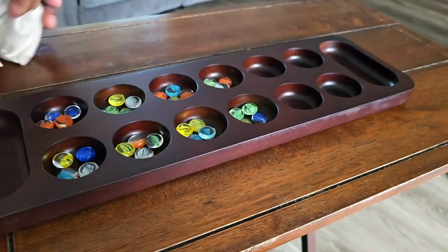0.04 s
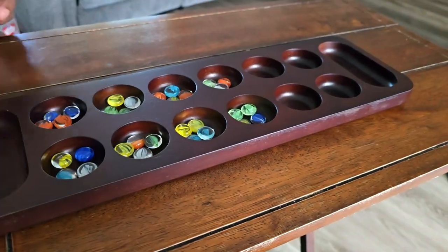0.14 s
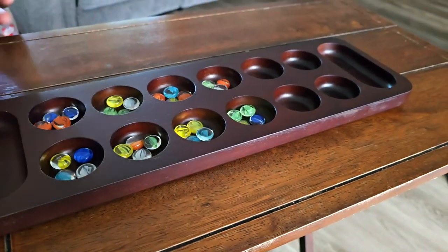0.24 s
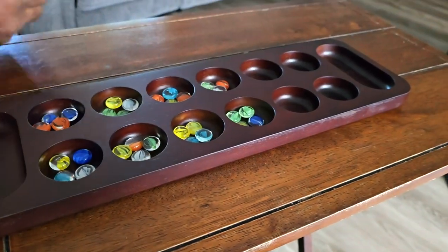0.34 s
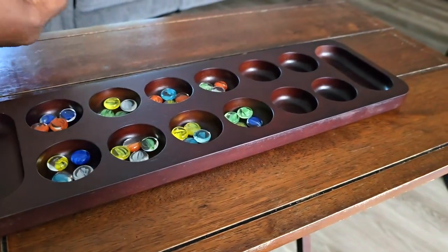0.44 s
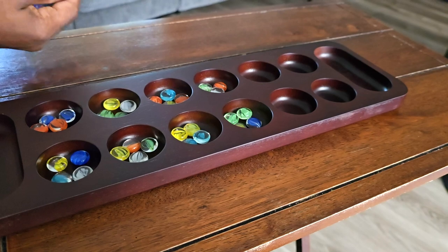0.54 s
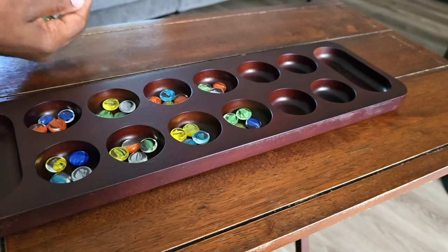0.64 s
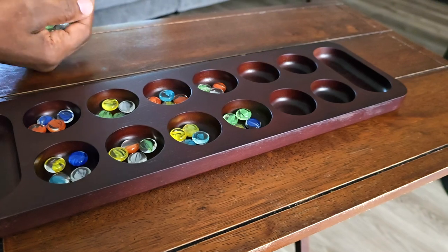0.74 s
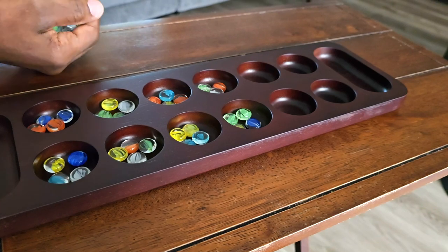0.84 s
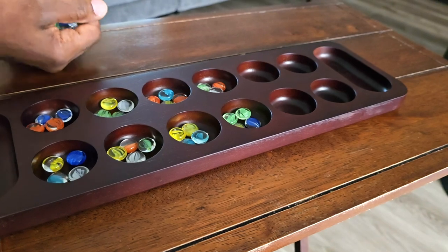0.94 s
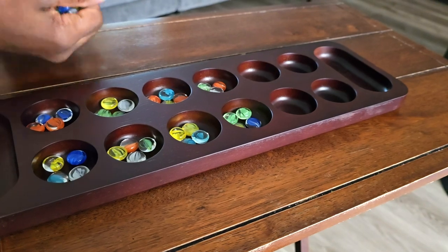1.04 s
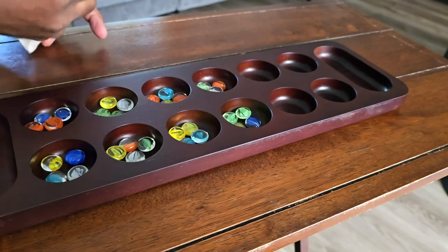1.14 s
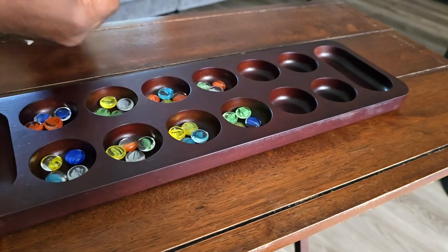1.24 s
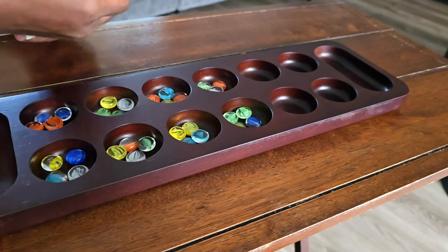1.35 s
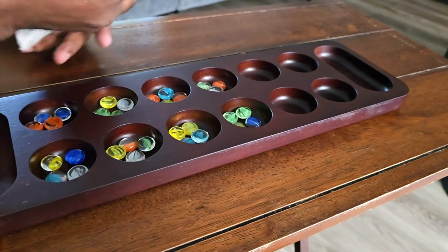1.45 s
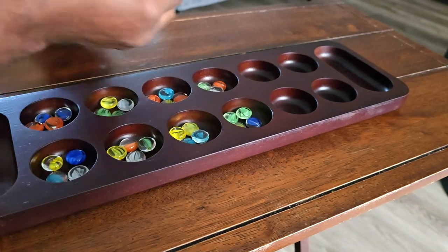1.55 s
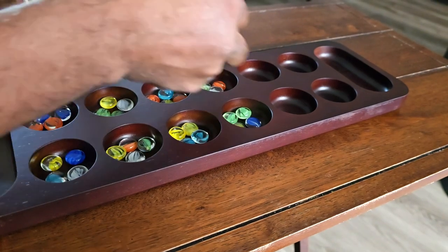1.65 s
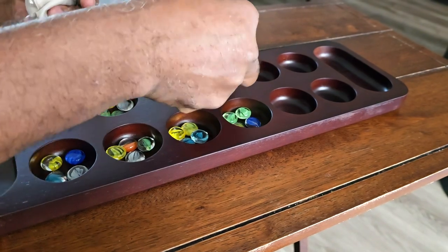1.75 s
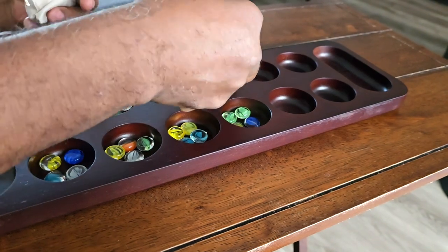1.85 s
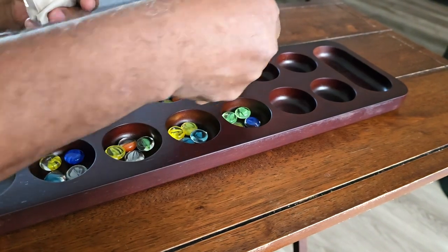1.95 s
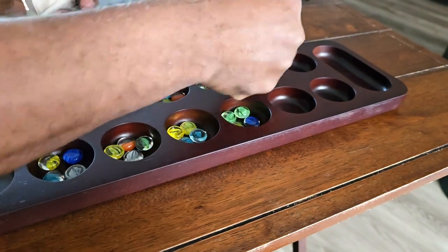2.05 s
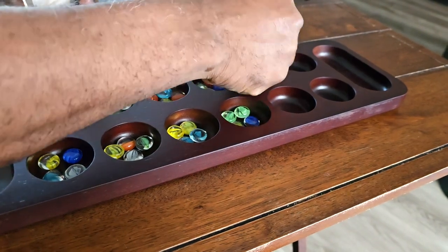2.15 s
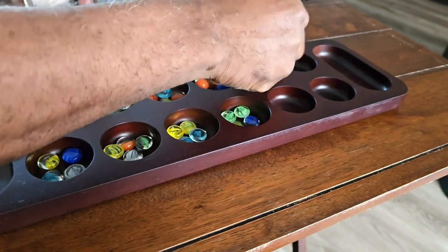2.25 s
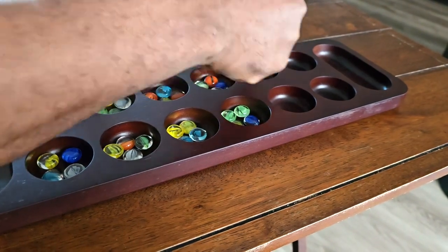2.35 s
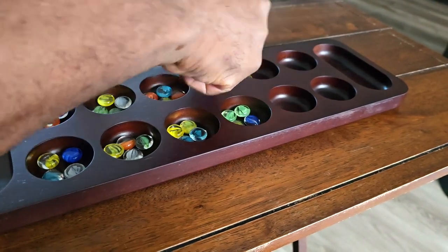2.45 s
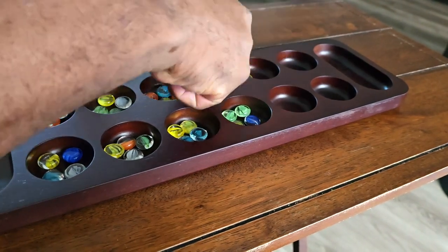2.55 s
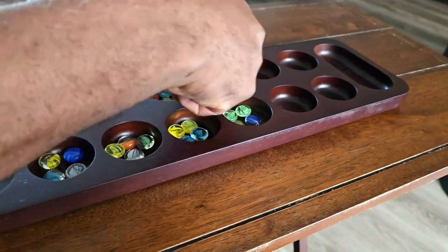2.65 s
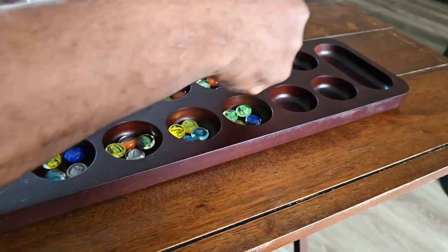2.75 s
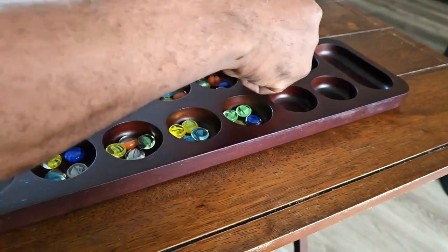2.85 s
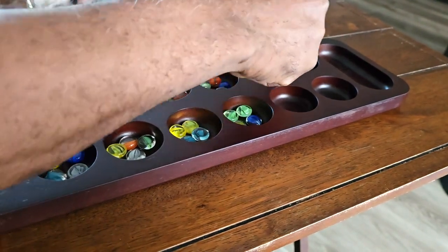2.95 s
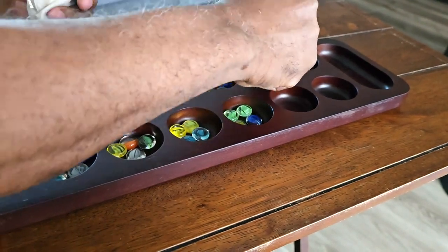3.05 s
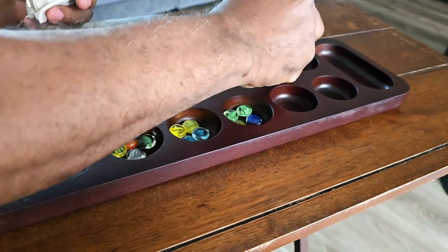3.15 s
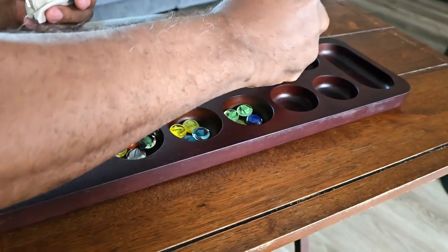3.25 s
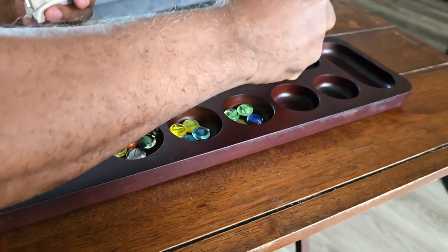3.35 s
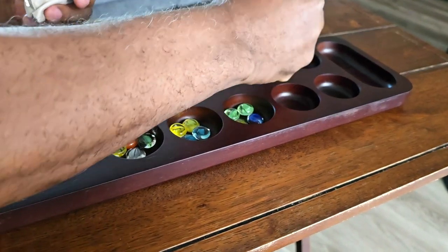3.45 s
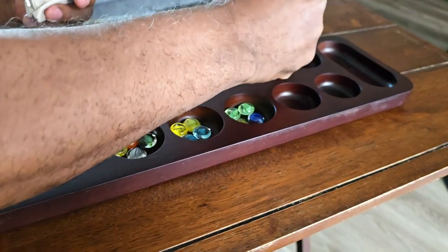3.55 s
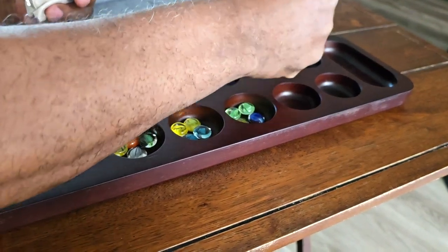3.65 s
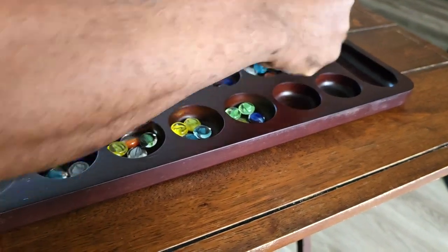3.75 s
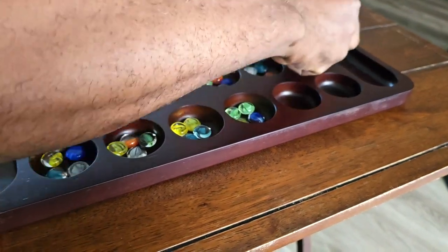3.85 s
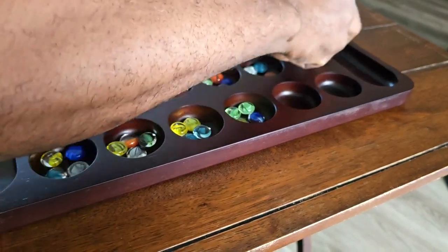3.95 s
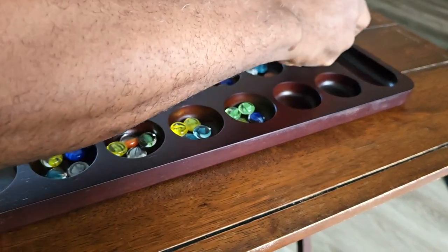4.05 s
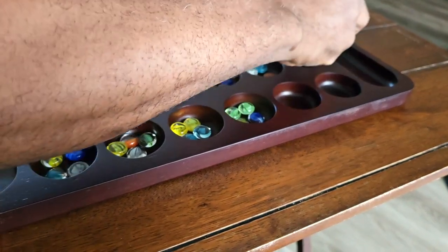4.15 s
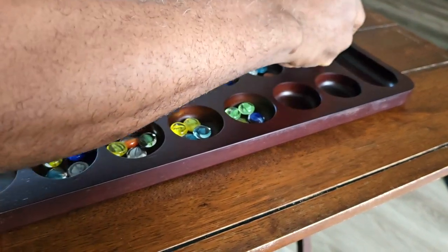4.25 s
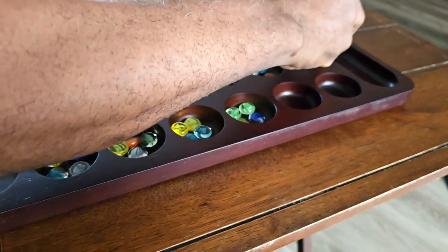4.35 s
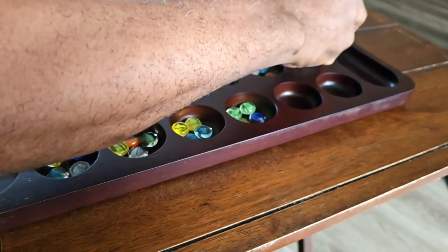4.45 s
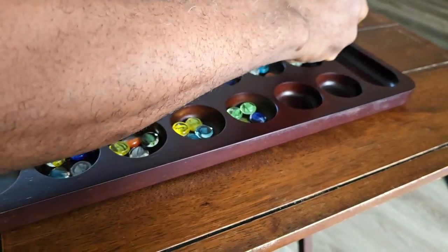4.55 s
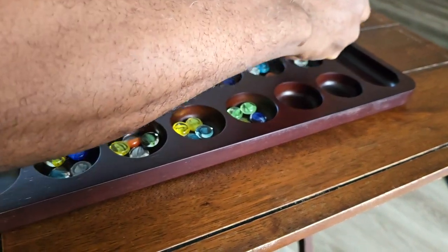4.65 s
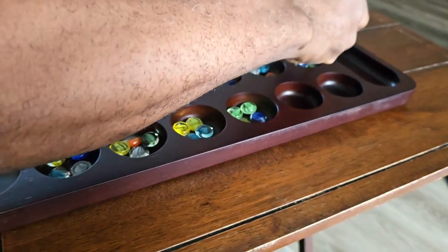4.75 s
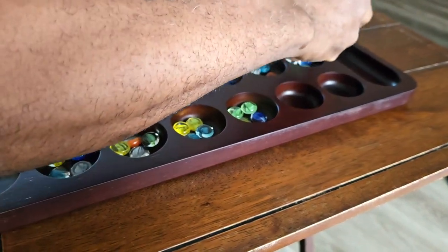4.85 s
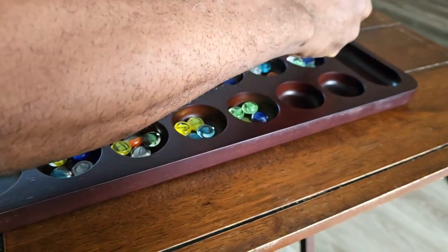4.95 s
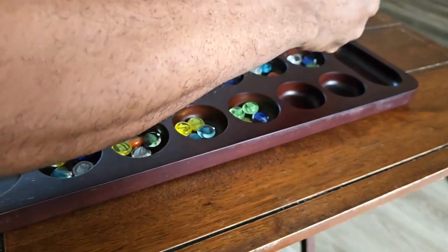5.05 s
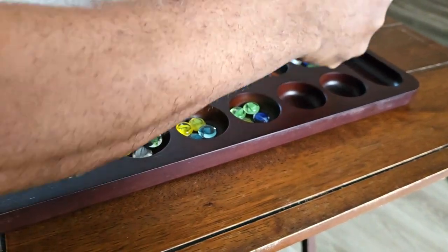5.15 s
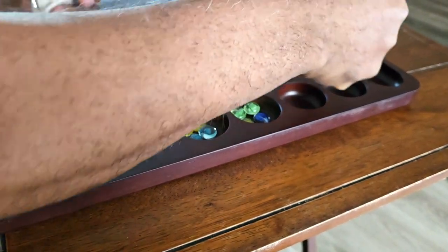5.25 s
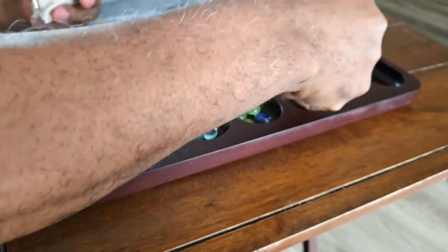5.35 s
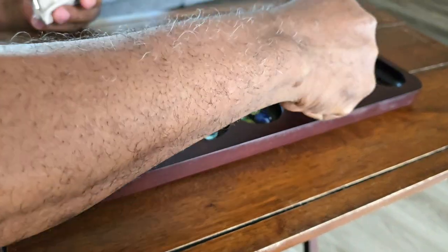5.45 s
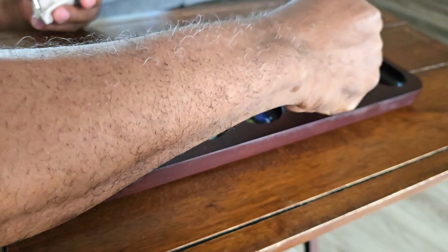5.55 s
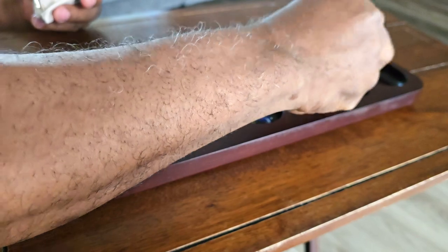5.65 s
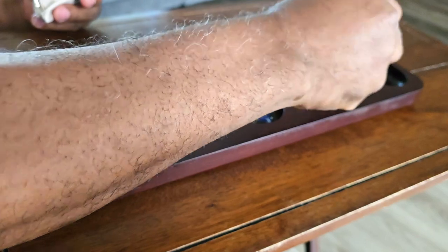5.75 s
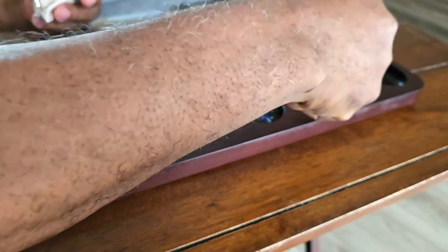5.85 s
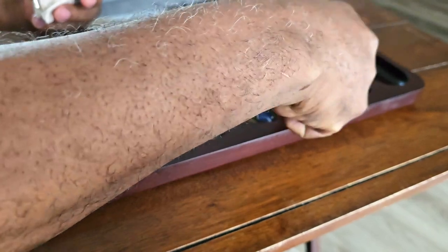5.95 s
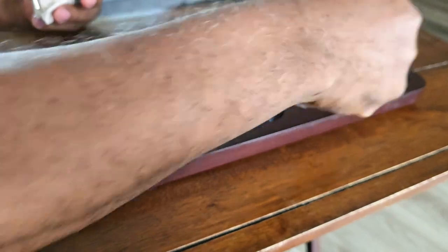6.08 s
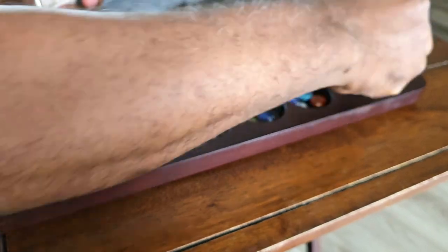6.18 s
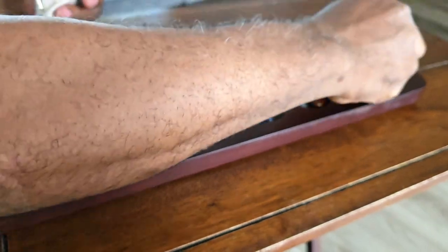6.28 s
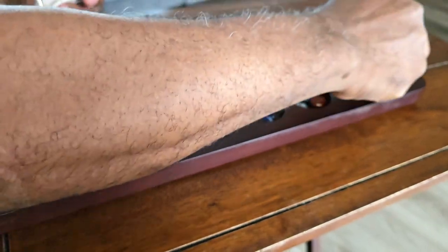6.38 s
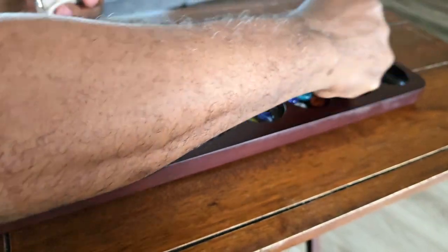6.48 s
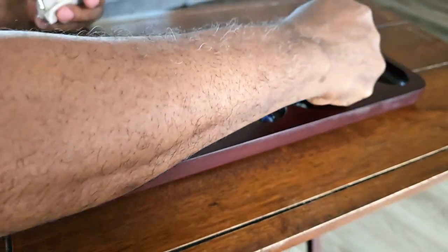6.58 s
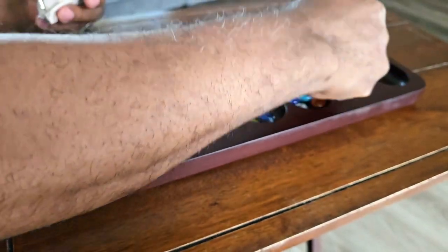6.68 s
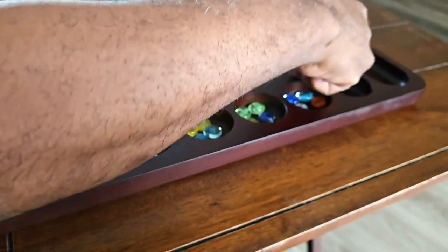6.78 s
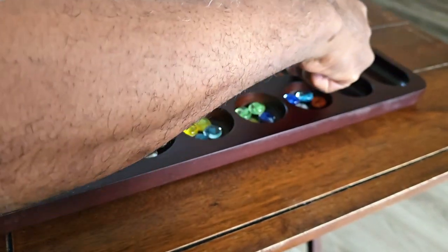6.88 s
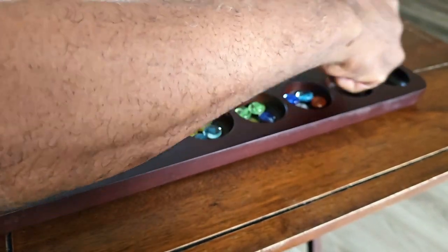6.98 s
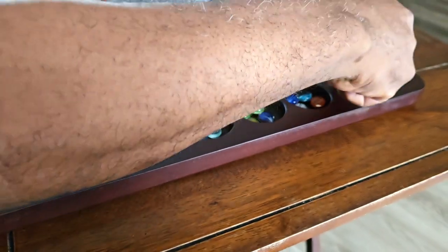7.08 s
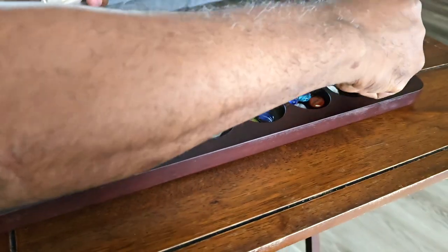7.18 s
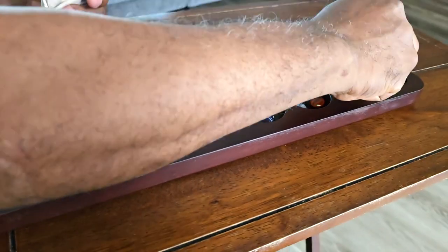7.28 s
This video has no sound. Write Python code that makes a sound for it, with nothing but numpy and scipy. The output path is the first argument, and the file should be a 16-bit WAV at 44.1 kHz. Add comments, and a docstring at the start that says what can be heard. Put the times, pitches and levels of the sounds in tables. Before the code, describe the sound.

Close stereo pickup in a small quiet room. For nearly two seconds a cloth bag rustles crisply while glass stones tick faintly in a palm. Then stones drop one at a time into hollow wooden cups, each a hard bright clack with quick rebounds and a short rattle against other stones, separated by near-silence and faint finger slides on wood.

```python
"""In a small, faintly humming room, glass stones leave a cloth bag for a hand and drop into a wooden game board.
Cloth, skin and rolling stones hiss as grainy noise; stones tick in the palm and the cloth snaps.
Each drop is short noise bursts plus fading rings of glass, air in the cup and wood, then rebounds and rattles.
Two microphone ports a few centimetres apart hear it, with echoes made of fading noise."""
import sys
import numpy as np
from scipy import signal
from scipy.io import wavfile
from scipy.ndimage import uniform_filter1d, minimum_filter1d

SR = 44100
rng = np.random.default_rng(int(sys.argv[2]) if len(sys.argv) > 2 else 0)


def to_wav(s):
    """Save 16-bit WAV."""
    ch = np.atleast_2d(s).T  # columns
    pcm = np.round(np.clip(ch, -1, 1) * 32767)  # PCM
    wavfile.write(sys.argv[1], SR, pcm.astype(np.int16))


N = 322812


def from_db(db):
    """Turn a level in dB into a plain multiplier."""
    return 10 ** (np.asarray(db) / 20)


def rms_one(x):
    """Scale a sound so that its rms (average strength) is 1."""
    return x / np.sqrt(np.mean(x ** 2) + 1e-20)


def high_pass(x, hz, order):
    """Keep what lies above a frequency."""
    return signal.sosfilt(signal.butter(order, hz, "high", fs=SR, output="sos"), x)


def low_pass(x, hz, order):
    """Keep what lies below a frequency."""
    return signal.sosfilt(signal.butter(order, hz, fs=SR, output="sos"), x)


def band_pass(x, low_hz, high_hz, order):
    """Keep what lies between two frequencies."""
    return signal.sosfilt(signal.butter(order, [low_hz, high_hz], "band", fs=SR, output="sos"), x)


def in_time(rows):
    """Read each column of a timed table at every sample; outside its times it gives -150 dB."""
    s, *columns = np.transpose(rows)
    t = np.arange(N) / SR
    return [np.interp(t, s, column, left=-150, right=-150) for column in columns]


def at_hz(points, hz):
    """Read a spectrum between its points, on a log-frequency axis."""
    table_hz, values = np.array(points).T
    return np.interp(np.log(hz), np.log(table_hz), values)


def held(start, end, first_db, last_db, edge_s=.01):
    """A gain that fades in, slopes from one level to another and fades out."""
    t = np.arange(N) / SR
    slope = from_db(np.interp(t, [start, end], [first_db, last_db]))
    edges = np.clip(np.minimum(t - start, end - t) / edge_s, 0, 1)
    return slope * edges


def drift(rate):
    """A slow random wander with rms 1; a higher rate in Hz wanders faster."""
    step = 40   # work on every 40th sample, then draw lines between
    r = np.exp(-2 * np.pi * step * rate / SR)
    chance = rng.standard_normal(N // step + 2002)
    slow = signal.lfilter([1], [1, -2 * r, r * r], chance)[2000:]   # drop the start-up
    return np.interp(np.arange(N) / step, np.arange(len(slow)), rms_one(slow))


def bands(white):
    """Cut noise into half-octave bands, taking two noise sets in turn: (centre in Hz, band)."""
    edges = 25 * 2 ** np.arange(0, 9.6, .5)
    for k, (low, high) in enumerate(zip(edges, edges[1:])):
        yield np.sqrt(low * high), band_pass(white[k % 2], low, high, order=3)


def two_ports(mid, side, alike):
    """Mix two noises into left and right: 1 is alike, 0 unrelated, -1 opposite."""
    return np.sqrt(1 + alike) * mid + np.sqrt(1 - alike) * side * [[1], [-1]]


# how alike steady noise is at the two ports: f/Hz, likeness (-1 to 1)
PORT_LIKENESS = [(60, -0.97), (180, 0.96), (550, 0.79), (1650, 0.17), (4970, -0.42), (15000, 0.35)]


def banded_noise(spectrum, white, patchy_db, rate):
    """Stereo noise of rms 1 whose bands each have their own level, flicker and likeness."""
    out = 0
    for hz, (mid, side) in bands(white):
        alike = np.clip(at_hz(PORT_LIKENESS, hz), -1, 1)
        gain = from_db(at_hz(spectrum, hz) + patchy_db * drift(rate))
        out = out + gain * two_ports(mid, side, alike)
    return rms_one(out)


# colour of the room air, before its overall level is set: f/Hz, relative level/dB per Hz
AIR_SPECTRUM = [(15, -44), (25, -18.5), (87, -15.5), (320, -32.5), (456, -3), (777, -11), (887, -4),
                (948, -15.5), (1380, -14.5), (1840, -32.5), (3210, -26.5), (5000, -49), (6500, -77),
                (11000, -120)]
# loudness of the room air: t/s, level/dB
AIR_LEVEL = [(0.0, -64), (4.4, -74.5), (4.81, -68.5), (5.44, -74), (5.59, -65), (7.07, -71.5), (7.32, -61)]


def room_air():
    """Faint coloured noise whose level follows a table and whose bands flicker a little."""
    white = rng.standard_normal((2, 2, N))
    return from_db(in_time(AIR_LEVEL)[0]) * banded_noise(AIR_SPECTRUM, white, patchy_db=0.5, rate=8.4)


# thin lines in the hum, before they waver: f/Hz, rms level/dB
HUM_LINES = [(882.9, -81), (1152, -89), (3155, -87.5)]


def hum_lines():
    """Sine waves of steady pitch whose strength wavers slightly."""
    t = np.arange(N) / SR
    return sum(np.sqrt(2) * from_db(db + 0.83 * drift(12)) * np.sin(2 * np.pi * hz * t) for hz, db in HUM_LINES)


# thin tones heard while stones rattle: start t/s, end t/s, middle f/Hz, first level/dB, last level/dB
RATTLE_TONES = [(4.77, 4.89, 1160, -57, -57.5), (4.905, 5.11, 1185, -52, -66), (5.5, 5.68, 318, -62, -59.5),
                (5.76, 5.92, 322, -64.5, -58.5)]


def rattle_tones():
    """Faint sine waves that come and go, with a slightly wandering pitch."""
    wavering = np.arange(N) / SR + np.cumsum(.015 * drift(10)) / SR   # pitch wanders by about 1.5 %
    out = 0
    for start, end, hz, first_db, last_db in RATTLE_TONES:
        out = out + np.sqrt(2) * held(start, end, first_db, last_db) * np.sin(2 * np.pi * hz * wavering)
    return out


# how long the main echo takes to fall by 60 dB: f/Hz, fade time/s
ROOM_T60 = [(200, 0.58), (600, 0.44), (1500, 0.29), (4000, 0.21), (9000, 0.21), (13000, 0.11),
            (16000, 0.17)]
# colour of the echo, before its overall level is set: f/Hz, relative level/dB
ROOM_COLOUR = [(200, -8.5), (1000, -0.5), (3000, -0.5), (5500, 4.5), (8000, 0.5), (12000, -4), (14000, -3),
               (16000, 2)]
# how alike the echo is at the two ports: f/Hz, likeness (limited to -1 to 1)
ROOM_LIKENESS = [(60, 0.45), (150, 0.55), (380, 0.72), (950, 1), (2380, 0.02), (5980, 0.12), (15000, 0.089)]
ROOM_DB, ROOM_BUILD_S = -3.5, 0.0017   # echo against direct sound; time for the echo to build up
NEAR_DB, NEAR_T60_S = -9, 0.15   # table top and arm: against the room's own start; time to fall 60 dB


def room(x):
    """Scattered reflections, modelled as noise that dies away band by band."""
    t = np.arange(int(.6 * SR)) / SR
    answer = 0
    for hz, (mid, side) in bands(rng.standard_normal((2, 2, len(t)))):
        alike = np.clip(at_hz(ROOM_LIKENESS, hz), -1, 1)
        walls = from_db(-60 * t / at_hz(ROOM_T60, hz))
        near = from_db(NEAR_DB - 60 * t / NEAR_T60_S)
        answer = answer + two_ports(mid, side, alike) * (walls + near) * from_db(at_hz(ROOM_COLOUR, hz))
    answer = answer * np.clip(t / ROOM_BUILD_S, 0, 1) ** 2
    answer /= np.sqrt(np.sum(answer ** 2) / 2)
    # the left port's sound feeds the echo of both ports
    return from_db(ROOM_DB) * signal.fftconvolve(x[:1], answer, axes=1)[:, :N]


# colour of slipping cloth, before its overall level is set: f/Hz, relative level/dB per Hz
SLIP_SPECTRUM = [(88, -52), (150, -29), (494, -6), (941, -7.5), (1420, -3.5), (4160, 0.5), (5250, -5),
                 (6640, -2), (8560, -8), (14800, -10.5), (16000, -10)]


def slipping():
    """Fibres and skin slip: dense noise grains of uneven size over smooth friction noise, rms 1."""
    sizes = from_db(3.4 * np.minimum(rng.exponential(1, N), 5))
    grains = sizes * (rng.random(N) < 900 / SR)   # about 900 grains a second
    grainy = rng.standard_normal((2, 2, N)) * (.12 + uniform_filter1d(grains, size=11))
    return banded_noise(SLIP_SPECTRUM, grainy, patchy_db=2.2, rate=10)


# the bag shifts its weight: t/s, peak level/dB
BAG_SHIFTS = [(0.238, -53), (.64, -60), (.992, -76), (1.5, -77)]
BAG_RISE_S, BAG_FALL_S = .05, .17   # time to move by 30 dB


def bag_weight():
    """Low noise that swells and sinks as the bag shifts its weight."""
    t = np.arange(N) / SR
    rumble = band_pass(rng.standard_normal((2, N)), 110, 400, order=2)
    swell = 0
    for s, db in BAG_SHIFTS:
        swell = swell + from_db(db - 30 * np.maximum((s - t) / BAG_RISE_S, (t - s) / BAG_FALL_S))
    return swell * rms_one(rumble)


# cloth and fingers: t/s, rustle level/dB, treble lift/dB
HANDLING = [(0.0, -57.5, -3), (0.024, -72, 5), (0.07, -54.5, -5), (0.18, -52, -10), (0.196, -42, -21),
            (0.272, -65, -11), (0.312, -47, 8), (0.368, -50.5, 4), (0.548, -49, 9.5), (0.634, -45, 11.5),
            (0.7, -53.5, 8), (0.71, -42, 9.5), (0.826, -56, -1), (0.862, -48.5, 11), (0.978, -57, 9.5),
            (0.982, -49.5, 13), (1.012, -77, 15), (1.124, -66, -5), (1.148, -49.5, 2), (1.274, -54, 10),
            (1.294, -68.5, 5), (1.376, -53.5, 4.5), (1.486, -52, 3), (1.512, -41.5, 5), (1.572, -64, 7),
            (1.658, -51, 8), (1.81, -85, 4)]


def cloth_rustle(slip):
    """Slipping noise that follows the handling, with its treble raised or lowered."""
    cloth_db, lift_db = in_time(HANDLING)
    treble = high_pass(slip, 8000, order=2)
    return from_db(cloth_db) * (slip + (from_db(lift_db) - 1) * treble)


# fingers sliding over stones and wood: start t/s, end t/s, level/dB, treble lift/dB
FINGER_SLIDES = [(1.987, 2.195, -66, 0), (2.55, 2.735, -61.5, -7.5), (3.26, 3.332, -62, -24.5),
                 (3.5, 3.58, -56.5, -9), (4.236, 4.4, -70.5, -29), (4.393, 4.517, -76, 3.5),
                 (5.303, 5.373, -81.5, 2), (5.9, 6.006, -64, -7), (6.008, 6.138, -55.5, 0),
                 (6.696, 6.827, -65, -20), (6.957, 7.139, -61.5, -20)]


def finger_slides(slip):
    """Short stretches of slipping noise, most of them with weaker treble."""
    dull = low_pass(slip, 4800, order=4)
    out = 0
    for start, end, db, lift_db in FINGER_SLIDES:
        out = out + held(start, end, db, db, edge_s=0.033) * (dull + from_db(lift_db) * (slip - dull))
    return out


# stones rattle to rest, levels before chance: start t/s, end t/s, first level/dB, last level/dB
RATTLES = [(1.842, 1.965, -19, -31.5), (2.239, 2.378, -17.5, -34.5), (2.883, 3.004, -35.5, -33),
           (3.038, 3.092, -38, -45), (3.319, 3.421, -27.5, -36), (3.611, 3.682, -29, -29),
           (4.026, 4.124, -37, -47), (4.508, 4.646, -21, -28.5), (4.768, 4.863, -23, -31.5),
           (4.909, 5.074, -28, -27.5), (5.51, 5.626, -37.5, -26), (5.65, 5.879, -21, -35.5),
           (6.032, 6.13, -52, -45.5), (6.326, 6.516, -41.5, -38), (6.551, 6.673, -34.5, -43),
           (6.827, 6.875, -37, -38), (7.122, 7.319, -44, -33)]
HISS_DB, ROLL_DB = -80, -25   # steady faint background hiss; rolling hiss against the rattle


def rolling_and_background_hiss(slip):
    """Rolling stones hiss like slipping cloth; a separate steady, faint background hiss is added."""
    rolling = from_db(ROLL_DB) * sum(held(*row) for row in RATTLES)
    background = from_db(HISS_DB)
    return (background + rolling) * slip


MODE_SPREAD_DB, PORT_SPREAD_DB = 1.5, 2.0   # random strength by blow and by port
PORT_LAG = 1   # samples by which the right port leads


def place(sounds, s, port):
    """Add up one short sound per start time, in seconds, as one port hears them."""
    span = sounds.shape[1]
    at = (np.asarray(s) * SR).astype(int)[:, None] + np.arange(span) + PORT_LAG * (1 - port)
    return np.bincount(at.ravel(), sounds.ravel(), N + span + PORT_LAG)[:N]


def strike(s, level_db, hz, t60, pan_db=0, length_s=.1, rise_s=0.00027):
    """A struck thing rings as a fading sine; strength varies by blow, strength and phase by port."""
    t = np.arange(int(length_s * SR)) / SR
    chance = rng.standard_normal((len(s), 5))
    out = np.zeros((2, N))
    short = np.clip(np.asarray(hz) / 3000, 0, 1)   # short waves reach the two ports unlike
    for port, sign in enumerate((1, -1)):
        db = level_db + MODE_SPREAD_DB * chance[:, 0] + sign * pan_db / 2
        db = db + short * PORT_SPREAD_DB * chance[:, 1 + port]
        phase = short * chance[:, 3 + port]
        rings = np.sin(2 * np.pi * np.outer(hz * np.ones(len(s)), t) + phase[:, None])
        rings *= from_db(db[:, None] - 60 * t / t60) * (1 - np.exp(-t / rise_s))
        out[port] = place(rings, s, port)
    return out


CRACK_T60_S = 0.0071   # time for the tiny touches to fall by 60 dB
FIRST_TOUCH_DB = 9   # first impact against the usual size of the touches, before filtering


def crack(s, level_db, low_hz, high_hz, pan_db=0):
    """The first 12 ms of a contact in one band: a sharp impact among tiny fading touches."""
    t = np.arange(int(.012 * SR)) / SR
    touches = rng.standard_normal((len(s), 3, len(t))) * from_db(-60 * t / CRACK_T60_S)
    touches *= np.clip(t / .0003, 0, 1)   # the contact builds up
    touches[:, 0, 12] = from_db(FIRST_TOUCH_DB)
    noise = band_pass(touches, low_hz, high_hz, order=3)
    out = np.zeros((2, N))
    for port, sign in enumerate((1, -1)):
        burst = noise[:, 0] + .55 * noise[:, 1 + port]   # a shared part and each port's own
        burst *= (from_db(level_db + sign * pan_db / 2) / np.abs(burst).max(axis=1))[:, None]
        out[port] = place(burst, s, port)
    return out


# stones touching in the palm, before each band's offset: t/s, level/dB
PALM_TICKS = [(0.074, -30.5), (0.0952, -38), (0.1474, -38), (0.1875, -38), (0.1985, -28), (0.291, -35),
              (0.3056, -23), (0.3765, -35), (0.39, -30.5), (0.4723, -29), (0.5625, -38), (0.576, -32),
              (0.7113, -50), (0.7544, -35), (0.8067, -27), (0.84, -29.5), (0.8586, -26), (0.9245, -28.5),
              (0.9837, -39.5), (1.1496, -28.5), (1.1922, -29.5), (1.272, -37), (1.3633, -32), (1.496, -44),
              (1.508, -31), (1.612, -35), (1.6533, -37), (1.705, -37)]


def palm_ticks():
    """Cupped stones tick: a bright noise burst with a much weaker lower one."""
    s, db = np.transpose(PALM_TICKS)
    return crack(s, db - 0.5, 6000, 16500) + crack(s, db - 19.0, 1500, 9560)


# cloth snapping taut: t/s, impulse level before filtering/dB
CLOTH_SNAPS = [(0.9373, -19.5), (0.9839, -13.5)]


def cloth_snaps():
    """Cloth snaps taut: a single filtered impulse, a sharp dip and then a slow return."""
    snaps = np.zeros(N)
    for s, db in CLOTH_SNAPS:
        snaps[int(s * SR)] = -from_db(db)
    dips = signal.lfilter([1, -1], [1, -.98], snaps)
    return signal.lfilter([.3], [1, -.7], dips)


# fingers on wood, levels before chance: t/s, level/dB, f/Hz
FINGER_THUMPS = [(2.433, -38, 398), (5.419, -43, 441), (7.057, -41, 482)]


def finger_thumps():
    """Fingers thump softly on wood: low rings that die at once."""
    s, db, hz = np.transpose(FINGER_THUMPS)
    return strike(s, db, hz, 0.018, rise_s=0.0013)


SHUDDER_DB, SHUDDER_HZ, SHUDDER_S = -49, 150, 0.022   # gain against the blows; top frequency; memory


def shudder(blows):
    """The table shudders: deep noise that follows the recent strength of the blows."""
    deep = low_pass(rng.standard_normal((2, N)), SHUDDER_HZ, order=2)
    keep = np.exp(-1 / (SHUDDER_S * SR))
    strength = np.sqrt(signal.lfilter([1 - keep], [1, -keep], blows[0] ** 2))
    return from_db(SHUDDER_DB) * rms_one(deep + deep[::-1] / 3) * strength


# the cup being filled, before chance: from t/s, air ring f/Hz, cup against glass in a rattle level/dB,
# board under cup level/dB, rim under cup level/dB, left over right level/dB, lowest click f/Hz
CUPS = [(1.8, 3890, -2.5, -32, -19, 1.5, 2370), (2.8, 2960, -2, -31, -21.5, 2.5, 2225),
        (3.9, 4150, -6.5, -32.5, -23, 1, 2420), (5.4, 2810, -1.5, -35, -22, 0.5, 2109),
        (6.2, 3400, 2.5, -35.5, -27, 1, 2666)]


def in_cup(s):
    """Look up the cup being filled at each time: all its columns but the first."""
    cups = np.array(CUPS)
    return cups[np.clip(np.searchsorted(cups[:, 0], s) - 1, 0, None), 1:].T


CHATTER_DB, CHATTER_GAP_S = -20, .008   # first rebound's highest level against its contact; usual spacing


def with_chatter(rows, count):
    """A stone bounces: a few weaker rebounds follow every contact at uneven gaps."""
    rows = np.array(rows)
    chance = rng.random((len(rows), count, 2))
    out = [rows]
    for k in range(count):
        again = rows.copy()
        later = rows[:, 0] + .003 + CHATTER_GAP_S * (k + chance[:, k, 0])
        again[:, 0] = np.minimum(later, (N - 1) / SR)
        again[:, [1, 3, 4]] += CHATTER_DB - 2.5 * k - 6 * chance[:, k, 1:]
        out.append(again)
    return np.vstack(out)


RATTLE_GAP_S, RATTLE_SPREAD_DB = .009, 3   # average gap; random spread of levels
RATTLE_GLASS_HZ, RATTLE_TOP_DB = 7700, -11.5   # middle glass ring; top click against glass click


def rattles():
    """Stones settle in many small contacts at uneven gaps; same columns as CONTACTS."""
    rows = []
    for start, end, first_db, last_db in RATTLES:
        chance = rng.standard_normal((40, 5))
        s = start + RATTLE_GAP_S * (np.arange(40) + .3 * chance[:, 0])
        db = np.interp(s, [start, end], [first_db, last_db])[:, None] + RATTLE_SPREAD_DB * chance[:, 1:4]
        glass_db, cup_db, top_db = db.T
        glass_hz = RATTLE_GLASS_HZ * (1 + .07 * chance[:, 4])
        new = np.c_[s, glass_db, glass_hz, cup_db + in_cup(s)[1], top_db + RATTLE_TOP_DB]
        rows.append(new[s < end])
    return np.vstack(rows)


# whole board, before cup and blow levels: f/Hz, level/dB, time to fall 60 dB/s
BOARD_MODES = [(282, -6, 0.083), (395.3, -1, 0.055), (459, -4, 0.071), (750, 10.5, 0.02),
               (877.5, 9.5, 0.023)]
# thin wood between the cups, before cup and blow levels: f/Hz, level/dB, time to fall 60 dB/s
RIM_MODES = [(1196, -11, 0.053), (1352, -3, 0.023), (1673, 2, 0.01), (1930, -4, 0.021), (2077, 1.5, 0.017)]
WOOD_SPREAD_DB = 3   # each blow meets the wood's rings differently


def wood_rings(s, cup_db):
    """Each blow makes the thin rims and the whole board ring at their own pitches."""
    _, _, board_db, rim_db, _, _ = in_cup(s)
    wood_db = cup_db + WOOD_SPREAD_DB * rng.standard_normal((len(s), len(RIM_MODES + BOARD_MODES))).T
    out = 0
    for blow_db, (hz, db, t60) in zip(wood_db, RIM_MODES):
        out = out + strike(s, blow_db + rim_db + db, hz, t60, rise_s=0.00037)
    for blow_db, (hz, db, t60) in zip(wood_db[::-1], BOARD_MODES):
        out = out + strike(s, blow_db + board_db + db, hz, t60, rise_s=0.002)
    return out


# clear stone contacts, levels before offsets and chance:
# t/s, glass click level/dB, glass ring f/Hz, cup click level/dB, top click level/dB
CONTACTS = [(1.8255, -10, 9860, -18.5, -10), (1.834, -10, 7770, -18.5, -9), (1.8575, -11, 7500, -27, -13),
            (1.87, -12.5, 7740, -28, -21), (1.8883, -13, 7400, -26.5, -13), (1.9011, -14, 7700, -24.5, -17),
            (1.9137, -16.5, 7700, -22.5, -29.5), (1.9238, -22, 7710, -24, -35.0),
            (1.935, -25.0, 7760, -32, -39.5), (1.9485, -33.5, 7700, -25.5, -42),
            (1.9621, -42, 7710, -34.5, -46), (2.1694, -4, 7320, -13, -4), (2.2057, -12.5, 7860, -31.5, -12),
            (2.2166, -13, 7040, -15.0, -19), (2.2377, -9, 7700, -18.5, -4), (2.2426, -19, 6520, -25.5, -13),
            (2.2648, -5, 7800, -15, -2), (2.2754, -14.5, 7200, -21, -25.5), (2.295, -14, 7400, -20, -15),
            (2.329, -34, 7300, -32, -31), (2.3521, -26, 10340, -28.5, -35.0),
            (2.369, -22.5, 7700, -30.5, -29), (2.381, -36, 8000, -36, -44.5),
            (2.4019, -34.5, 7440, -37.5, -41), (2.552, -54, 7260, -41.5, -64),
            (2.5605, -50, 8000, -47, -65.5), (2.5802, -44, 7050, -33, -72), (2.633, -73, 7200, -55, -89),
            (2.652, -43, 7500, -36.5, -48), (2.6926, -60, 9380, -60, -57), (2.7001, -58, 7210, -49, -72),
            (2.7103, -61.5, 7600, -47.5, -61), (2.8873, -8, 7350, -12.5, -15),
            (2.9085, -15, 7600, -25.5, -24.5), (2.9252, -14.0, 8150, -19, -12),
            (2.9414, -18.5, 6860, -24.0, -13), (2.9542, -22, 7440, -25.5, -32),
            (2.9695, -24, 7050, -28, -30), (3.0367, -49.0, 7340, -42.5, -52.5),
            (3.0412, -27, 7460, -32, -32), (3.0521, -43, 6480, -36, -41.5), (3.0756, -43, 6200, -36, -36),
            (3.1392, -49, 10270, -60, -36.5), (3.15, -50, 10700, -58, -60),
            (3.3095, -9.0, 7110, -16.5, -7.5), (3.3132, -12, 7700, -14.5, -10),
            (3.3407, -13, 7730, -22.5, -13), (3.383, -22, 9840, -22.5, -21), (3.514, -78, 7210, -64, -85),
            (3.5557, -5, 7320, -10.5, -3), (3.6054, -11, 9600, -15, -6.5), (3.6428, -12, 9220, -19.5, -11),
            (3.6572, -28, 7200, -27, -28.5), (3.802, -48.5, 6850, -53, -40),
            (3.8707, -61, 9880, -68, -52.5), (3.9987, -9.5, 7200, -10.0, -4.5),
            (4.0227, -8.5, 7050, -18, -7), (4.0722, -35, 7100, -29, -39.5),
            (4.1246, -42.5, 7060, -33.5, -57.5), (4.1603, -21.5, 7630, -26, -16),
            (4.261, -72, 7880, -53.5, -71), (4.294, -81.5, 7180, -56, -87.5),
            (4.3256, -75, 7180, -49.5, -97), (4.352, -79.5, 7100, -61, -98),
            (4.4033, -49, 7800, -54, -32.5), (4.4504, -46, 9370, -55, -32), (4.4943, -14, 8400, -26, -8),
            (4.501, -5, 7930, -9.5, -8), (4.5419, -17.5, 7300, -19.5, -31), (4.573, -15, 7100, -17, -16),
            (4.5796, -12.5, 7160, -18, -10), (4.5999, -14.5, 7560, -21, -21.0),
            (4.6138, -11, 7470, -18.5, -11.0), (4.6207, -26, 7200, -22.5, -26),
            (4.7579, -9.5, 7940, -18.5, -7), (4.7662, -15, 7600, -17, -20),
            (4.7706, -12.5, 8020, -24.5, -8), (4.7902, -17, 8300, -18.5, -7.5),
            (4.7997, -16.5, 8150, -21, -26), (4.8046, -14, 7450, -19.5, -8.5),
            (4.8156, -18.0, 7040, -17, -23), (4.833, -30, 7080, -26.5, -34.5),
            (4.8574, -29, 7300, -33.5, -40), (4.9027, -3.5, 7640, -9, -2.5), (4.919, -13.5, 6930, -23, -20),
            (4.9304, -13.5, 7400, -15, -17.5), (4.948, -13.5, 7060, -17.5, -11),
            (4.953, -12, 6940, -15, -14), (4.9697, -27, 7100, -22.5, -35.5),
            (4.9838, -15, 8070, -20.5, -17.0), (4.9983, -12.5, 7350, -15.5, -18),
            (5.0186, -15, 7120, -24, -21), (5.0378, -18.5, 10100, -20, -15),
            (5.0531, -24.5, 10100, -32, -24.5), (5.0667, -36, 7320, -37, -41.0),
            (5.1772, -45.5, 9670, -59, -47.5), (5.2405, -58, 9650, -72, -61.5),
            (5.3045, -52, 9840, -72.5, -40.5), (5.3173, -53.5, 10350, -68.5, -45),
            (5.3226, -54, 9800, -64, -39.0), (5.3532, -50.5, 10200, -64.5, -39.5),
            (5.457, -7.0, 9660, -13, -10), (5.501, -9.5, 7840, -13, -5.5), (5.534, -14.5, 6570, -19.0, -31),
            (5.553, -26.0, 6180, -34, -35), (5.5589, -18.5, 7660, -24, -13),
            (5.5681, -23, 8000, -29, -23.5), (5.5815, -20, 8930, -29, -18), (5.5889, -20.0, 9900, -32, -12),
            (5.609, -21, 9100, -39, -20), (5.6392, -14, 9000, -32, -14), (5.6433, -12, 9800, -12.5, -10),
            (5.653, -19, 9800, -22, -10), (5.6625, -4, 6700, -9.5, -19), (5.6882, -2, 9480, -9, -11.0),
            (5.7171, -13, 7680, -15.5, -12), (5.7358, -7.5, 8950, -14.5, -18.0),
            (5.7395, -11.5, 8900, -24, -17), (5.7576, -25, 6160, -25, -29), (5.7648, -21, 8010, -20.5, -26),
            (5.7707, -16, 7000, -25.5, -29), (5.7947, -13, 7800, -16.5, -15),
            (5.8249, -19, 6540, -20.5, -39), (5.846, -19.5, 9800, -25, -35),
            (5.8601, -27, 7540, -29.0, -38.5), (5.869, -27, 10200, -30.0, -35.5),
            (5.9715, -61, 8970, -56.5, -57), (6.022, -31.5, 8000, -34, -41.0),
            (6.0409, -40.0, 6400, -39, -61), (6.0807, -25.5, 7700, -34, -31), (6.0976, -34, 8530, -34, -45),
            (6.115, -39.0, 8200, -46, -57), (6.1195, -41.5, 8680, -41.5, -58),
            (6.2729, -5.5, 8050, -8.5, -7), (6.3147, -19.5, 8310, -16.5, -14.5),
            (6.326, -25, 8310, -23, -33.5), (6.3368, -23.0, 8550, -25, -32.5),
            (6.3423, -29, 8400, -23, -25), (6.3478, -24, 8100, -29.5, -27), (6.3641, -34, 8230, -30, -42.0),
            (6.3674, -29, 8450, -27.5, -40.0), (6.3935, -43, 8420, -28, -47.5),
            (6.4175, -36, 8140, -33, -49.0), (6.441, -32, 8300, -30.5, -38.0),
            (6.4648, -29, 8260, -27, -27), (6.488, -33, 8400, -30, -40), (6.5059, -36, 8310, -36, -30),
            (6.5133, -42, 7340, -34, -46.5), (6.5385, -13.5, 8060, -10, -16),
            (6.5574, -25.0, 6910, -21.5, -38.5), (6.5715, -20, 8240, -14, -10),
            (6.5853, -19, 8200, -20, -22), (6.6344, -27.5, 8350, -25.5, -28), (6.6478, -39, 7900, -34, -47),
            (6.653, -35, 8120, -32.5, -46.5), (6.6656, -40, 7640, -35.5, -51.5),
            (6.7164, -62, 8300, -38.5, -48), (6.7605, -72.5, 7310, -64, -67),
            (6.798, -78.5, 7430, -42.5, -73.0), (6.8084, -71, 7470, -41.5, -65.5),
            (6.825, -23, 8070, -27, -16), (6.8378, -25.5, 9100, -33, -25), (6.8582, -38, 6960, -35.0, -32),
            (6.9204, -62, 6110, -51, -66.5), (6.925, -57, 7420, -51.0, -72), (7.0598, -67, 7500, -49, -87),
            (7.0687, -75, 7280, -43.5, -91), (7.1101, -8, 8580, -12, -7.5), (7.1391, -16, 8020, -19.5, -14),
            (7.1517, -14, 8000, -19.5, -13.0), (7.1696, -25, 8120, -24, -25),
            (7.183, -16.5, 9750, -21, -13.5), (7.187, -15.5, 7210, -30, -20),
            (7.2151, -33, 7110, -26.0, -27.0), (7.234, -29, 8000, -29.5, -42.5),
            (7.252, -31, 8160, -29, -23), (7.261, -22, 8130, -35, -31), (7.2735, -29.5, 8220, -32, -40.0),
            (7.2916, -7, 8000, -12, -8)]
# rings of the air in a cup: ratio to its ring f/Hz, level/dB, time to fall 60 dB/s
CUP_RINGS = [(1.022, 0, 0.0082), (0.66, -2, 0.0033), (1.9, -4, 0.002)]
# rings of a glass stone: ratio to its ring f/Hz, level/dB, time to fall 60 dB/s
GLASS_RINGS = [(0.998, 4, 0.0096), (2.9, -10, 0.0068), (1.4, -4.5, 0.016)]
CUP_SPREAD, PAN_SPREAD_DB = .12, 2   # each contact lies elsewhere in the cup: pitch (share), left over right
CUP_RING_DB, RING_DB = -10, -6   # air rings and glass rings against their clicks
BEAMED_CLICK_DB = -8.5   # extra cup click thrown straight upward


def stones():
    """Contacts crack and ring the wood; the cup beams its air and glass rings upward, past the room."""
    s, glass_db, glass_hz, cup_db, top_db = np.vstack([with_chatter(CONTACTS, count=2), rattles()]).T
    cup_hz, _, _, _, pan_db, low_hz = in_cup(s)
    chance = rng.standard_normal((len(s), 2))
    cup_hz = cup_hz * np.exp(CUP_SPREAD * chance[:, 0])
    pan_db = pan_db + PAN_SPREAD_DB * chance[:, 1]

    beamed = 0
    for ratio, db, t60 in CUP_RINGS:
        beamed = beamed + strike(s, cup_db + CUP_RING_DB + db, cup_hz * ratio, t60, pan_db, length_s=0.017)
    for ratio, db, t60 in GLASS_RINGS:
        beamed = beamed + strike(s, glass_db + RING_DB + db, glass_hz * ratio, t60, pan_db, length_s=.02)

    cup_click = 0
    cup = np.searchsorted(np.array(CUPS)[:, 0], s)
    for number in set(cup):   # each cup's click has its own lowest frequency
        k = cup == number
        cup_click = cup_click + crack(s[k], cup_db[k] - 3.0, low_hz[k][0], 4560, pan_db[k])
    glass_click = crack(s, glass_db, 6460, 10990, pan_db)
    top_click = crack(s, top_db - 3.0, 11000, 15270, pan_db)
    beamed = beamed + from_db(BEAMED_CLICK_DB) * cup_click
    spread = cup_click + glass_click + top_click + wood_rings(s, cup_db)
    # little deep bass comes through under the blows
    return high_pass(spread, 220, order=3), high_pass(beamed, 220, order=3)


def scene():
    """Lay the stones and their room echo over handling noise, faint hiss and hum."""
    background = room_air() + hum_lines() + rattle_tones()
    slip = slipping()
    handling = cloth_rustle(slip) + finger_slides(slip) + bag_weight()
    hiss = rolling_and_background_hiss(slip)
    spread, beamed = stones()
    spread = spread + palm_ticks() + cloth_snaps() + finger_thumps()
    return beamed + spread + room(spread) + shudder(spread) + handling + hiss + background


def record(dry):
    """A fast limiter holds loud peaks to about 0.8 of full scale, then the top is cut at 17 kHz."""
    headroom = np.minimum(1, .8 / (np.abs(dry).max(axis=0) + 1e-9))
    gain = uniform_filter1d(minimum_filter1d(headroom, size=89), size=45)   # starts just before each peak
    cut = signal.cheby2(18, 90, 17000, fs=SR, output="sos")
    return signal.sosfilt(cut, dry * gain)


dry = scene()
out = record(dry)
to_wav(out)
```